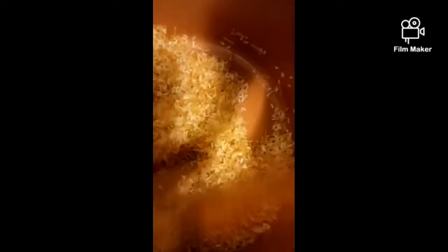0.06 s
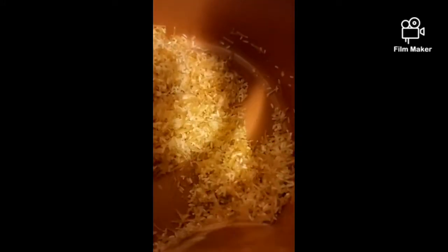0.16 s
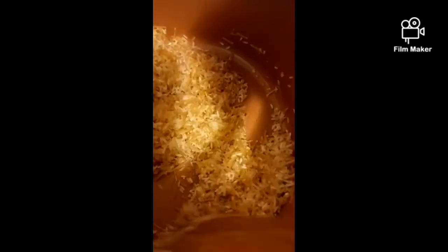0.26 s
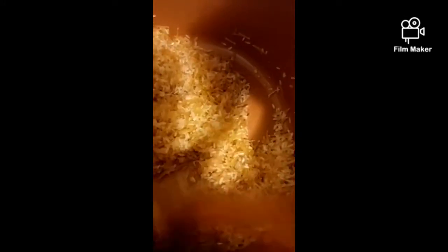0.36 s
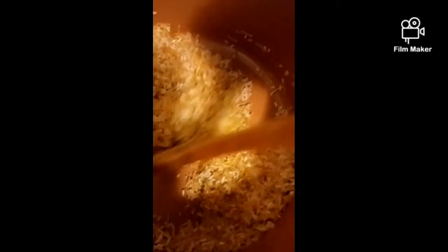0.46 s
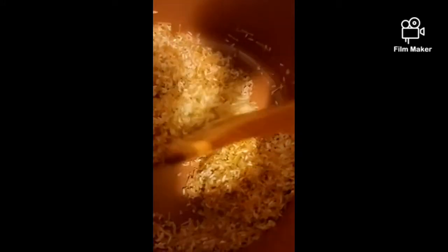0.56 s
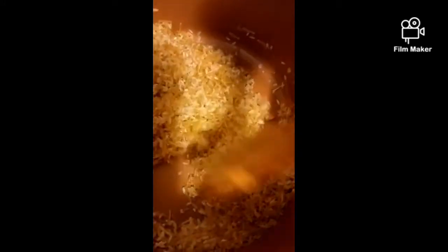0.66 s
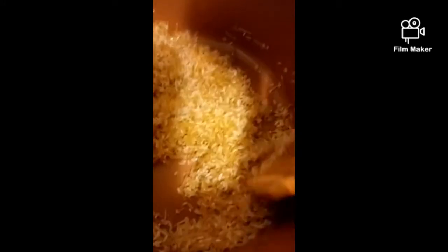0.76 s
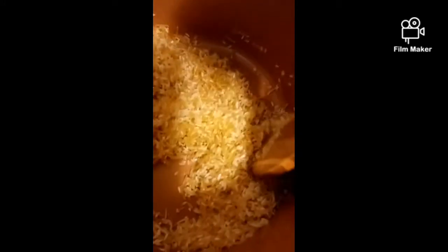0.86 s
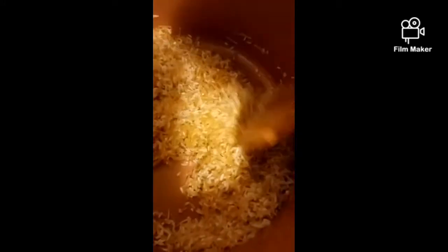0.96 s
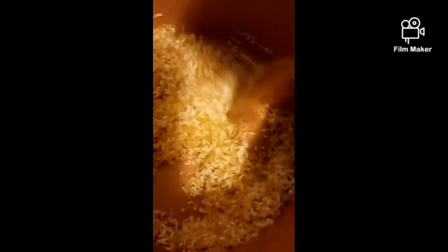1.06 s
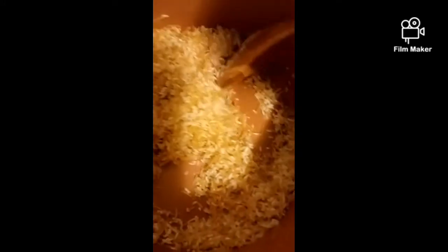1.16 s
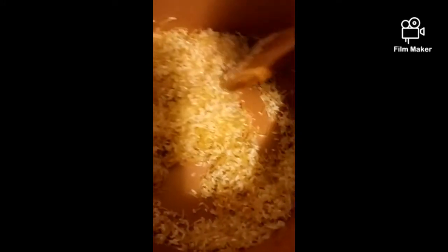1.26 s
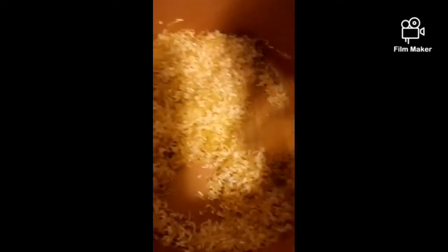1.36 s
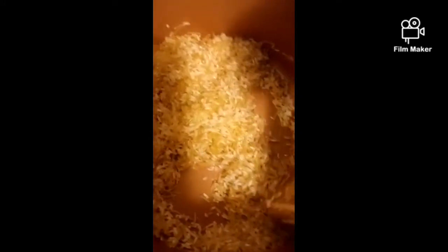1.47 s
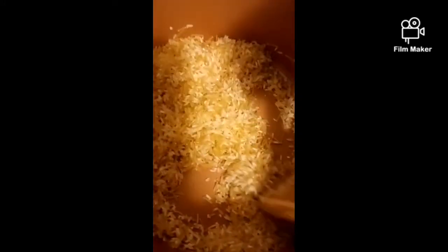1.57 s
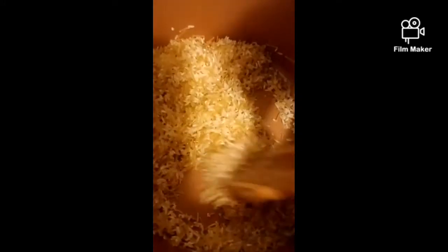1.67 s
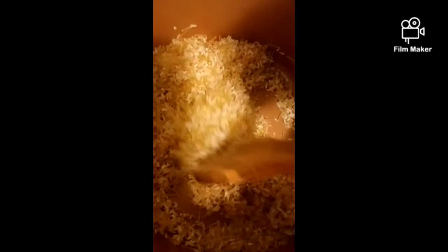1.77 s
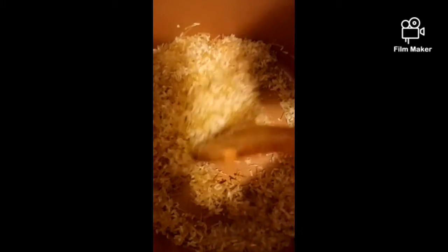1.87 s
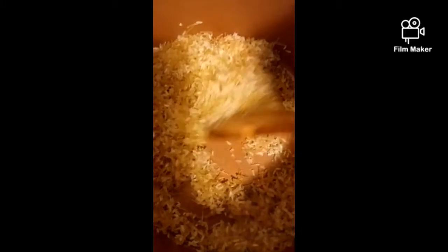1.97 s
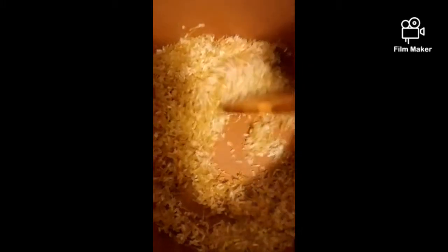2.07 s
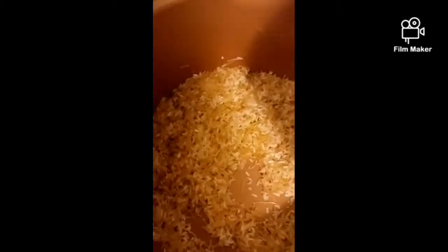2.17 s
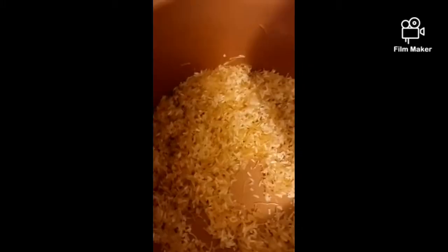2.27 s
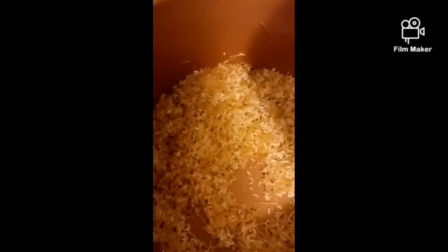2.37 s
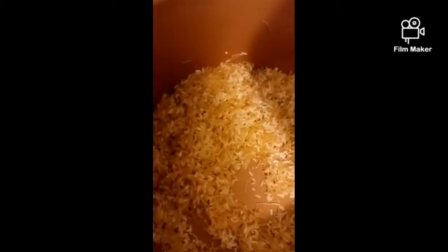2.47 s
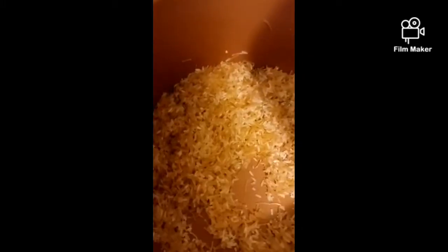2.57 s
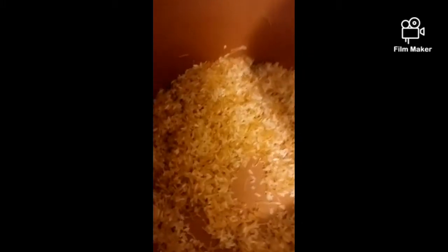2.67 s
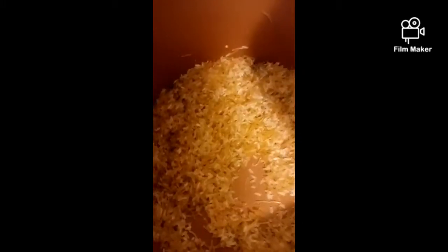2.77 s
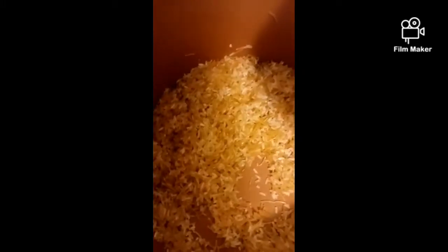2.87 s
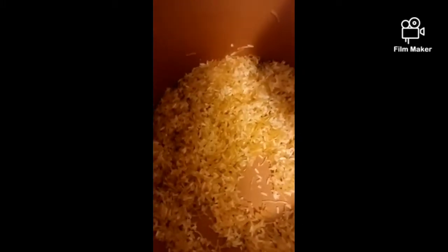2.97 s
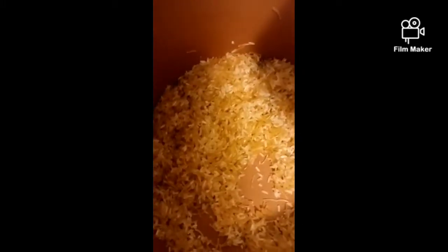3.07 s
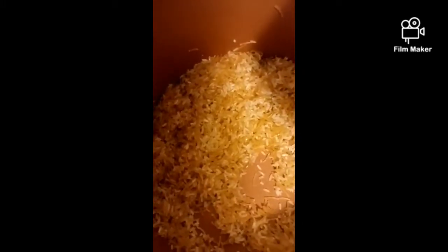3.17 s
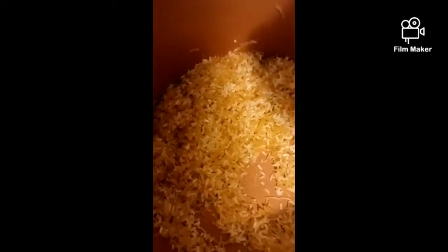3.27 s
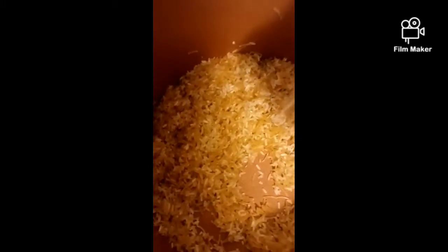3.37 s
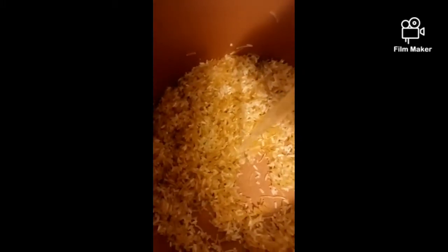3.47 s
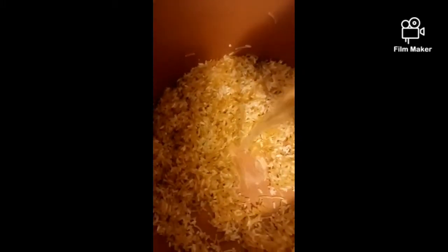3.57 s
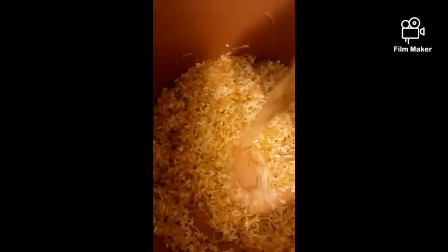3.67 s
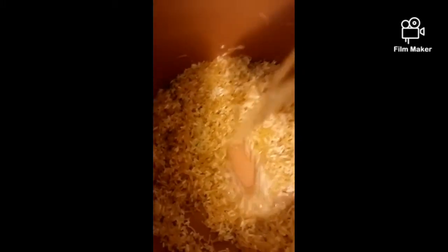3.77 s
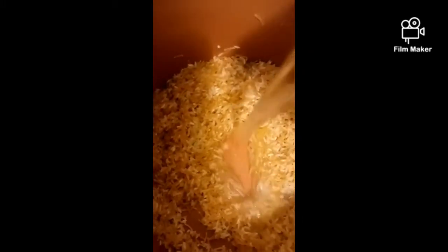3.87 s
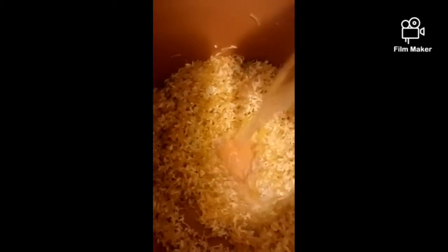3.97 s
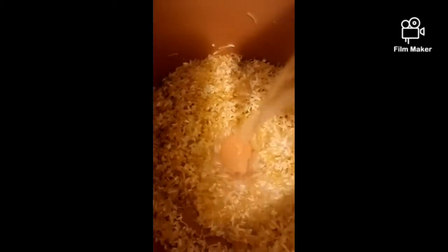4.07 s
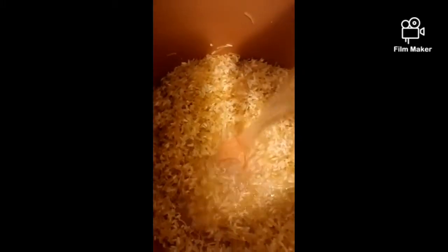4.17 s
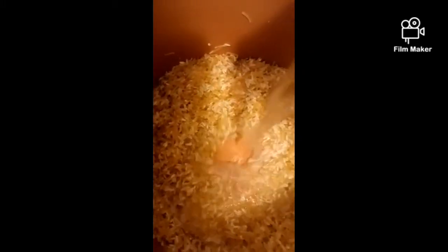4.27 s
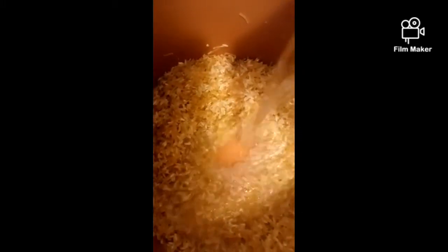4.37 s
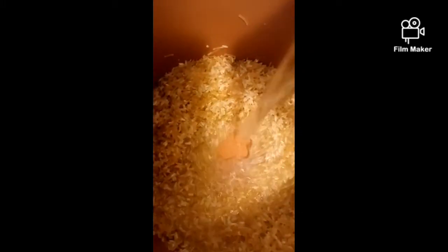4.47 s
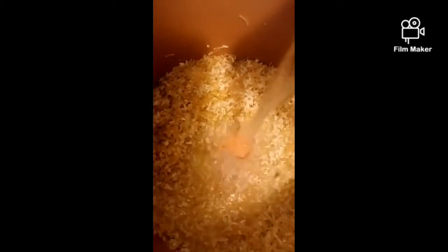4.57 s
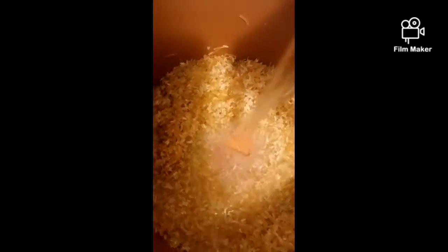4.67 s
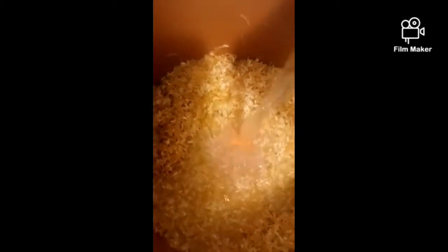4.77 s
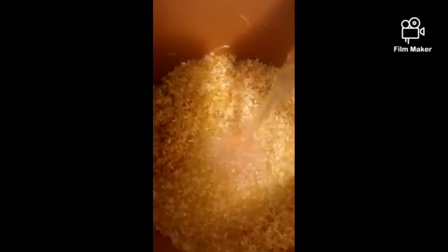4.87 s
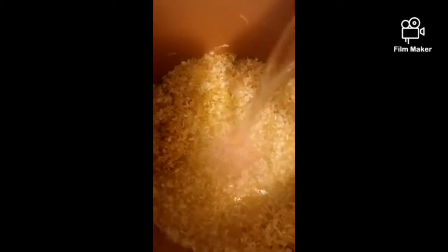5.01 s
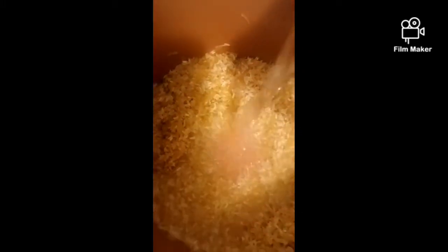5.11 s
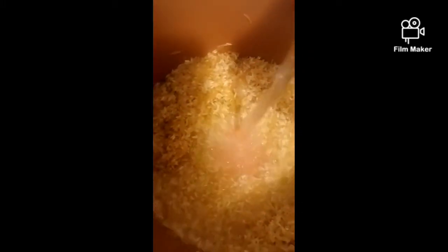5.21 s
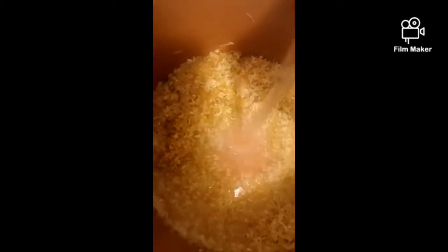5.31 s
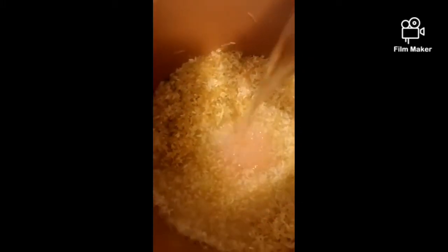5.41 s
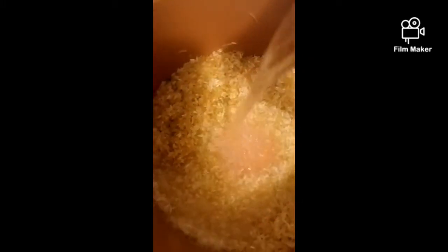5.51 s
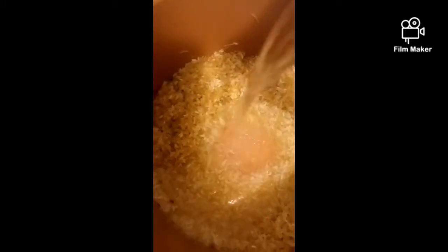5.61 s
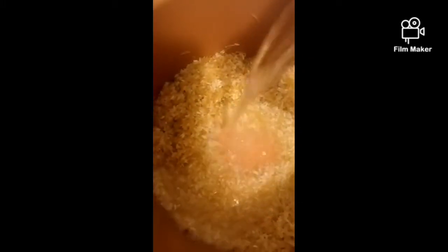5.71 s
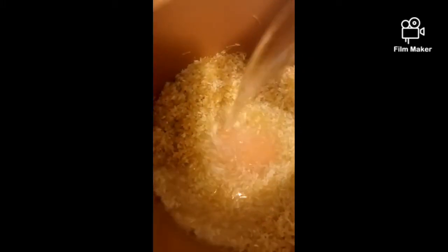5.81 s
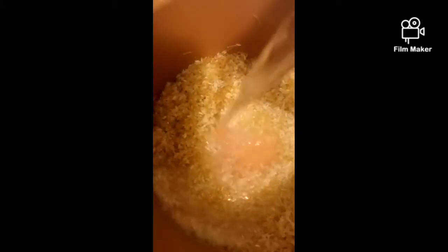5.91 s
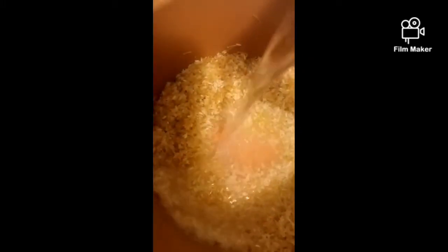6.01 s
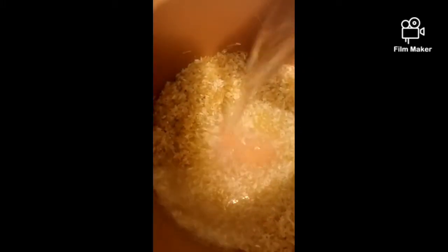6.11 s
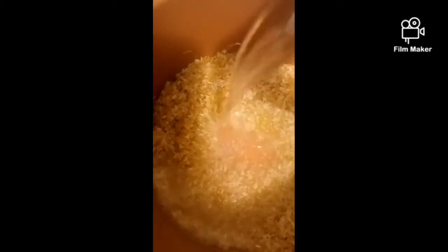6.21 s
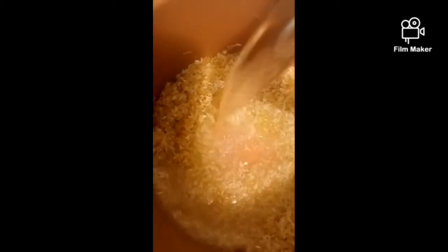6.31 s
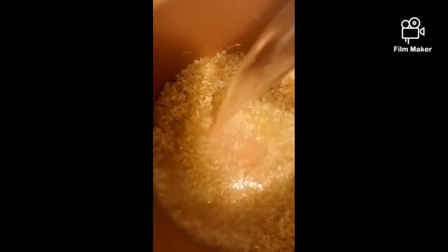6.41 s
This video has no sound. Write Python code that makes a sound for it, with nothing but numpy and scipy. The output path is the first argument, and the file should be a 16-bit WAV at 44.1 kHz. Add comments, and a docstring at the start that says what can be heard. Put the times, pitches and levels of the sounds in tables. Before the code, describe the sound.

Dry grains click and rustle as a spoon turns them, knocking and scraping a ringing pot for under three seconds. Dull bumps of a handled microphone intrude, strongest as stirring ends. After a lull with faint rumble, hiss and a stray click, a water jet bursts on, sizzling over the grains and growing fuller and bubblier, its bright spray easing. Close microphone in a small room.

```python
"""Stirring dry rice, then a running tap

Close up, a wooden spoon stirs dry rice in a pot: random clicks, coloured by spectrum, tick and rustle.
Scrapes and knocks ring the pot's resonances; fingers on the microphone add dull, sinking thuds.
Then a tap opens: dense droplets hiss on the grains, and rising damped tones bubble in the water.
A small kitchen answers the knocks and ticks; low rumble and steady hiss lie beneath.
"""
import sys
import numpy as np
from scipy import signal
from scipy.fft import rfft, irfft, next_fast_len
from scipy.io import wavfile
from scipy.ndimage import map_coordinates

SR = 44100
rng = np.random.default_rng(int(sys.argv[2]) if len(sys.argv) > 2 else 0)


def materialize(psi):
    """Save the field psi as 16-bit PCM at rate SR to the path in sys.argv[1].

    A 1-D psi becomes a single channel; in a 2-D psi each row is a channel.
    """
    bounded = np.clip(np.atleast_2d(psi).T, -1, 1)
    quanta = np.round(bounded * 32767).astype(np.int16)
    wavfile.write(sys.argv[1], SR, quanta)


N = 284445  # samples in the scene

# colour of the rice grains, relative: pitch_hz [Hz], level_db [dB per Hz]
GRAIN_SPECTRUM = [(300, -47), (1500, -30), (3200, -20.5), (4200, -12.5), (5100, -5), (5700, -13.5),
                  (6400, -15), (7700, -27.5), (9500, -12), (11200, -1), (12600, 0.5), (14000, -3.5),
                  (16000, -11.5)]
# how hard the rice is stirred: time_s [s], level_db [dB]
STIRRING_LEVEL = [(0, -41), (.35, -41), (.5, -41), (.64, -45), (1.0, -40), (1.62, -46.5), (1.85, -41),
                  (2.0, -43), (2.68, -44)]
# the strongest dull handling bumps: start_s [s], peak_db [dB]
HANDLING_BUMPS = [(0.1461, -22), (0.1696, -20.5), (0.1911, -18), (0.221, -26), (0.6213, -21.5),
                  (0.6465, -26), (0.6724, -19), (0.8901, -30), (0.9063, -26), (1.21, -24), (1.2618, -28.5),
                  (1.3672, -29.5), (1.528, -29), (1.5886, -30), (1.633, -31), (1.7573, -30.5),
                  (2.1186, -32), (2.152, -28), (2.2125, -25.5), (2.268, -19.5), (2.286, -26),
                  (2.464, -17.5), (2.492, -17), (2.5304, -22), (2.5583, -17), (2.619, -11.5),
                  (2.7163, -24.5), (2.877, -33.5), (3.89, -31.5), (3.913, -29.5), (4.5077, -26),
                  (5.273, -32.5)]
STIR_ENDS_S, SETTLE_S = 2.64, 0.16  # the heap comes to rest


def ticks():
    """Each hard grain gives a sharp click and a brief rattle among its neighbours; heavier hits sound lower."""
    # the loudest grains that strike the pot: start_s [s], level_db [relative dB],
    # weight_db [dB added to the colour below 7 kHz]
    loud_grains = [(0.0253, -24, -3), (0.1062, -24, -5), (0.153, -18, -2.5), (0.2007, -28, 2),
                   (0.2467, -18.5, -1), (0.289, -22, 5), (0.296, -19, 0), (0.3328, -26, 0),
                   (0.3668, -19.5, -2), (0.405, -20, -1), (0.411, -19, -3), (0.6344, -26, 7),
                   (0.6647, -20.5, 2.5), (0.6957, -19, 3), (0.7156, -16.5, -3), (0.7296, -25, 0),
                   (0.741, -23, 4), (0.8572, -21, 1), (0.862, -20, 2), (0.899, -19.5, 1), (0.944, -26, 3),
                   (0.9591, -22, -3), (1.018, -22.5, -1), (1.0548, -22, -2), (1.159, -18, 0),
                   (1.18, -22, 0), (1.3113, -25, 9), (1.7458, -22, 3), (2.0753, -26, -3),
                   (2.1037, -24, -10), (2.196, -21, -9), (2.297, -16, -2.5), (2.459, -20.5, -3),
                   (2.5307, -25, -8), (2.559, -25, -7), (2.5974, -18, -1), (3.338, -18, -1)]
    rattle_gain, rattle_t60_s = 0.17, 0.0094
    loudness_samples = 66  # the opening of the click that sets its level
    out = np.zeros(N)
    t = np.arange(SR // 50) / SR
    hz, grain_db = np.transpose(GRAIN_SPECTRUM)
    for start_s, level_db, weight_db in list(loud_grains) + stray_grains():
        rattle = rng.standard_normal(len(t)) * amp(-60 * t / rattle_t60_s)
        force = (t == 0) + rattle_gain * rattle
        click = coloured(force, np.c_[hz, grain_db + weight_db * (hz < 7000)])
        add(out, start_s, amp(level_db - 4.5) * click / click[:loudness_samples].std())
    return out


def stray_grains():
    """Fainter grains fly at random, louder with harder stirring; same columns as the loud grains."""
    rate_per_s, over_stirring_db = 25, 14.5
    level_scatter_db, weight_scatter_db = 2.0, 0.5
    start_s = moments(rate_per_s, STIR_ENDS_S)
    level, weight = rng.standard_normal(size=(2, len(start_s)))
    stirring_db = np.interp(start_s, *np.transpose(STIRRING_LEVEL))
    level_db = stirring_db + over_stirring_db + level_scatter_db * level
    return list(zip(start_s, level_db, weight_scatter_db * weight))


def rustle():
    """The heap slides in little avalanches: small clicks over a fine rubbing of husks."""
    gain_db, fine_db = -1.0, -3  # fine_db: rubbing relative to the clicks
    clump_db, surge_db = 2, 1.4  # depth of the quick and of the slow swelling
    grains = patter(rate=1200, spread_db=8) + amp(fine_db) * rng.standard_normal(N)
    clumped = grains * amp(clump_db * wobble(60))
    surge = amp(gain_db + surge_db * wobble(10.36))
    return stirring() * surge * unit(coloured(clumped, GRAIN_SPECTRUM))


def stirring():
    """Gain of the moving heap: it follows the stirring and dies as the rice settles."""
    level_db, = curves(STIRRING_LEVEL)
    return amp(level_db) * (1 - ramp(STIR_ENDS_S, SETTLE_S))


def scrape():
    """The spoon drags grains along the wall, which resounds with their slips; trapped grains crunch."""
    # strokes of the spoon: start_s [s], length_s [s], scrape_db [relative dB], crunch_db [dB]
    strokes = [(0.445, 0.032, -29.5, -55), (0.902, 0.069, -41.5, -61), (1.029, 0.13, -33, -37),
               (1.714, 0.081, -39, -44.5), (1.836, 0.023, -35, -50), (1.95, 0.16, -44, -65),
               (2.29, 0.047, -44.5, -55)]
    # colour of the rubbed wall, relative: pitch_hz [Hz], level_db [dB per Hz]
    wall_spectrum = [(150, -21), (300, -4.5), (500, 1), (640, -4.5), (800, -12.5), (1150, -17),
                     (1450, -15.5), (2200, -16), (2850, -15.5), (3500, -14.5), (4500, -31), (5150, -9),
                     (5700, -44), (6400, -17.5), (7700, -35), (16000, -10)]
    # colour of crushed grains, relative: pitch_hz [Hz], level_db [dB per Hz]
    husk_spectrum = [(1000, -23), (2300, -23), (2800, -2), (3500, -16.5), (4500, -9), (5200, 3), (5800, -8),
                     (6500, -9), (7700, -27), (11500, -1.5), (16000, -20)]
    gain_db, judder_db = -1, 1.0
    drag_db = -10.5  # between strokes the heap rubs on the wall, relative to the stirring
    rubbing = amp(drag_db) * stirring()
    crushing = np.zeros(N)
    for start_s, length_s, scrape_db, crunch_db in strokes:
        pressure = stroke(start_s, length_s)
        rubbing = np.maximum(rubbing, amp(scrape_db) * pressure)
        crushing += amp(crunch_db) * pressure
    slips = patter(rate=3200, spread_db=3) * amp(judder_db * wobble(110))
    ringing_wall = unit(pot(coloured(slips, wall_spectrum)))
    crunch = unit(coloured(patter(rate=3900, spread_db=0), husk_spectrum))
    return amp(gain_db) * rubbing * ringing_wall + crushing * crunch


def stroke(start_s, length_s):
    """Gain of one stroke: a quick bite, growing pressure, release."""
    attack_s, swell_db, release_t60_s = 0.0036, 7, 0.28
    after_s = np.maximum(np.arange(N) / SR - start_s - length_s, 0)
    pressure_db = swell_db * (ramp(start_s, length_s) - 1)
    return ramp(start_s, attack_s) * amp(pressure_db - 60 * after_s / release_t60_s)


def knocks():
    """Knocks, at first from the spoon, chatter and ring the pot; slips of the spoon give short tones."""
    # knocks on the pot: start_s [s], level_db [relative dB],
    # centre_hz [Hz, of the contact], width [octaves], chatter_t60_s [s]
    pot_knocks = [(0.217, -26, 1930, 0.95, 0.028), (0.441, -29.5, 3570, 0.44, 0.083),
                  (0.456, -28.5, 3800, 0.82, 0.064), (.482, -34.5, 2800, 1.1, 0.033),
                  (0.8579, -31.5, 1160, 1.17, 0.11), (1.135, -29, 3800, 0.98, .07),
                  (1.574, -21, 1470, 1.2, 0.086), (1.849, -34, 1400, 1.12, 0.075),
                  (1.875, -42, 900, 1.2, 0.068), (2.727, -45, 1500, 1.9, 0.018),
                  (2.778, -38.5, 280, 0.66, 0.033), (3.127, -39.5, 332, 2.2, 0.27),
                  (3.3374, -33.5, 3760, 1.1, 0.027)]
    # the spoon catches on the bottom and slips: start_s [s], peak_db [dB], pitch_hz [Hz]
    spoon_slips = [(.468, -30, 507), (.492, -27.5, 500), (.5, -27, 490), (.524, -36, 490),
                   (1.735, -22.5, 456), (1.753, -16, 505), (1.874, -29, 554), (2.117, -39.5, 490),
                   (2.352, -42, 493)]
    # colour of the blow, as of wood, relative: pitch_hz [Hz], level_db [dB per Hz]
    wood_spectrum = [(120, 19), (230, 21), (500, 11), (800, -5), (1150, -2.5), (1500, -6), (2200, -5),
                     (2800, -8.5), (5000, -0.5), (6500, -4.5), (7700, -14.5), (12000, 11)]
    strike_gain = 5  # first impulse against the chatter
    loudness_samples = 400  # the opening of the blow that sets its level
    out = np.zeros(N)
    t = np.arange(SR // 3) / SR
    grid_hz = np.geomspace(50, SR / 2, num=60)
    for start_s, level_db, centre_hz, octaves, t60_s in pot_knocks:
        chatter = rng.standard_normal(len(t)) * amp(-60 * t / t60_s)
        force = strike_gain * (t == 0) + chatter
        # the contact picks the range struck: the colour falls away on both sides of its centre
        off_centre_db = np.minimum(3 * (np.log2(grid_hz / centre_hz) / octaves) ** 2, 50)
        contact = np.c_[grid_hz, along(wood_spectrum, grid_hz) - off_centre_db]
        blow = pot(coloured(force, contact))
        add(out, start_s, amp(level_db - 3) * blow / blow[:loudness_samples].std())
    for start_s, peak_db, pitch_hz in spoon_slips:
        add(out, start_s, amp(peak_db) * throb(pitch_hz, rise_s=0.0025))
    return out


def pot(x):
    """The direct sound plus the ringing of the pot's modes."""
    # the pot's resonances: pitch_hz [Hz], level_db [dB over the direct sound], t60_s [s]
    modes = [(246, 6, 0.12), (423, -1, 0.032), (505, 0.5, 0.099), (1086, 4, 0.08), (1180, 5.5, 0.041),
             (1757, 3, 0.022), (2100, 1.5, 0.014), (2320, -3, 0.037), (2660, 5, 0.025), (2880, -6, .05),
             (3440, 0, 0.035), (4030, 5, 0.026), (4960, 1.5, 0.014), (5270, -10, 0.022)]
    t = np.arange(SR // 5) / SR
    response = (t == 0) * 1.0
    for pitch_hz, level_db, t60_s in modes:
        fade = amp(-60 * t / t60_s)
        response += amp(level_db) * 2 * fade / fade.sum() * np.cos(2 * np.pi * pitch_hz * t)
    return signal.fftconvolve(x, response)[:len(x)]


def bumps():
    """Fingers shift on the microphone's housing: soft thuds whose deepest part arrives last."""
    final_hz, detune_scatter = 88, 0.061
    out = np.zeros(N)
    thuds = list(HANDLING_BUMPS) + fidgets()
    detunes = rng.normal(1, detune_scatter, len(thuds))
    for (start_s, peak_db), detune in zip(thuds, detunes):
        add(out, start_s, amp(peak_db) * throb(final_hz * detune, rise_s=0.0062, bend=1.33))
    return out


def fidgets():
    """Fingers stick and slip: a fainter thud leads each bump and another trails it; same columns as the bumps."""
    shortest_gap_s = 0.018  # the longest is twice that
    relative_db, scatter_db = -12.5, 5  # the scatter only weakens them
    gap, drop = rng.random((2, len(HANDLING_BUMPS), 2))
    bump_s, bump_db = np.transpose(HANDLING_BUMPS)
    start_s = bump_s[:, None] + np.array([-1, 1]) * shortest_gap_s * (1 + gap)
    peak_db = bump_db[:, None] + relative_db - scatter_db * drop
    return list(zip(start_s.ravel(), peak_db.ravel()))


def tap():
    """The aerated jet bursts into droplets on the rice and beats bubbles into the water."""
    # the jet's spray: time_s [s], level_db [dB]
    jet_level = [(3.57, -20.5), (3.66, -17.5), (3.82, -21), (5.9, -26), (6.42, -26.5)]
    # colours of droplets on rice, jet on bare bottom, jet on water and bubbling pool,
    # each relative: pitch_hz [Hz], level_db [dB per Hz]
    spray_spectrum = [(4000, -24.5), (7700, -23), (8600, -16.5), (10000, -7), (11300, 1), (12500, 0.5),
                      (14000, -2.5), (16000, -12)]
    bottom_spectrum = [(1200, -41), (1600, -21), (1780, -1), (2080, -2), (2300, -15), (2680, -11),
                       (2900, 1), (3200, -11), (3500, -1.5), (4300, 0), (5020, 7), (5800, 2), (6400, 3),
                       (7700, -36), (10000, -39)]
    splash_spectrum = [(900, -37), (1550, -19), (2150, -16.5), (2600, -10.5), (3000, -9), (3800, -6.5),
                       (4500, -4.5), (5020, 0.5), (5750, -9.5), (6350, -7.5), (7000, -16), (7700, -33),
                       (10000, -29)]
    pool_spectrum = [(40, -56), (100, -14), (160, -13), (250, -4), (380, -6.5), (510, 3), (740, -6.5),
                     (1000, -5.5), (1170, -1), (1450, -8), (2200, 2), (4000, -55)]
    opens_s, opening_s = 3.537, 0.02
    gather_s, dry_pool_db = 0.63, -10  # bubbling starts this much weaker and grows to full strength
    shallow_splash_db, shallow_pool_db = -28, -39.5
    depth_splash_db, depth_pool_db = 2.5, 1.8  # more water splashes and bubbles more
    deep_cushion_db = -4  # deep water softens splash and bubbling
    flutter_db, bubble_db, pitch_rise = 0.6, -9, 1.095

    # the water covers the bottom, rises, and at last cushions the jet
    covered = ramp(3.74, 0.38)
    depth = ramp(4.54, 2.5)
    cushion_db = deep_cushion_db * ramp(5.24, 0.87)
    spray_db, = curves(jet_level)
    splash_db = shallow_splash_db + depth_splash_db * depth + cushion_db
    gathering_db = dry_pool_db * (1 - ramp(opens_s, gather_s))
    pool_db = shallow_pool_db + gathering_db + depth_pool_db * depth + cushion_db
    valve = ramp(opens_s, opening_s) ** 2

    drops = patter(rate=16000, spread_db=2.5) * amp(flutter_db * wobble(300))
    small_bubbles = bubbles(1626, 7280, cycles=62, count=6000)
    fizz = amp(bubble_db) * small_bubbles + patter(rate=14000, spread_db=2.5)
    large_bubbles = bubbles(259, 1640, cycles=9.0, count=2500, size=1500)
    gurgle = amp(bubble_db) * large_bubbles + patter(rate=9000, spread_db=4.0)

    spray = amp(spray_db) * unit(coloured(drops, spray_spectrum))
    # the jet drums on the bottom until water covers it
    drumming = np.sqrt(1 - covered) * unit(coloured(drops, bottom_spectrum))
    splash = np.sqrt(covered) * unit(coloured(fizz, splash_spectrum))
    # the air above the water shrinks: crossfade to a higher resonance
    risen_spectrum = np.multiply(pool_spectrum, [pitch_rise, 1])
    hollow = (1 - depth) * coloured(gurgle, pool_spectrum) + depth * coloured(gurgle, risen_spectrum)
    return valve * (spray + amp(splash_db) * (drumming + splash) + amp(pool_db) * unit(hollow))


def kitchen(x):
    """The room's short tail; the treble dies first."""
    # the room's decay: pitch_hz [Hz], t60_s [s]
    decay = [(100, 0.66), (500, 0.55), (3000, 0.12), (12000, 0.06)]
    frame = 256  # samples, also the delay before the tail
    hz, t, bins = signal.stft(rng.standard_normal(SR // 2), SR, nperseg=frame)
    fade = amp(-60 * t / along(decay, hz)[:, None])
    tail = signal.istft(bins * fade, SR, nperseg=frame)[1]
    return signal.fftconvolve(np.pad(x, (frame, 0)), tail / np.linalg.norm(tail))[:N]


def background():
    """Low room rumble, which sinks at 3.8 s, and a steady hiss, both coloured noise."""
    # colours of rumble and hiss, each relative: pitch_hz [Hz], level_db [dB per Hz]
    rumble_spectrum = [(30, -27), (60, -3), (110, 2.5), (170, -10.5), (250, -4), (400, -18), (560, -30),
                       (900, -32), (2000, -52)]
    hiss_spectrum = [(500, -36), (900, -27), (2000, -17.5), (3000, -12.5), (4200, -8), (5050, -3),
                     (5700, -11), (6400, -9), (7700, -26), (9500, -10.5), (11500, 2), (13000, -2.5),
                     (16000, -5.5)]
    start_db, sink_db, hiss_db = -50, -14.5, -49.5
    rumble_db = start_db + sink_db * ramp(3.78, 0.34)
    rumble = unit(coloured(rng.standard_normal(N), rumble_spectrum)) * amp(0.47 * wobble(7.45))
    hiss = unit(coloured(rng.standard_normal(N), hiss_spectrum))
    return amp(rumble_db) * rumble + amp(hiss_db) * hiss


def amp(db):
    """Decibels to gain."""
    return 10 ** (np.asarray(db) / 20)


def unit(x):
    """Scale to rms 1."""
    return x / np.sqrt(np.mean(x ** 2) + 1e-20)


def along(points, hz):
    """Read a curve of (Hz, value) points on a log axis."""
    point_hz, value = np.transpose(points)
    return np.interp(np.log(hz + 1), np.log(point_hz), value)


def curves(rows):
    """One value per sample for each column after the time."""
    time_s, *columns = np.transpose(rows)
    return [np.interp(np.arange(N) / SR, time_s, column) for column in columns]


def ramp(start_s, duration_s):
    """Rises evenly from 0 to 1 over the duration."""
    return np.clip((np.arange(N) / SR - start_s) / duration_s, 0, 1)


def wobble(rate):
    """A smooth random curve, rate knots a second."""
    knots = rng.standard_normal(int(N * rate / SR) + 4)
    return map_coordinates(knots, [np.arange(N) * rate / SR])


def moments(rate, until_s):
    """Random times before until_s, one in each slot of 1 / rate seconds."""
    time_s = (np.arange(200) + rng.random(200)) / rate
    return time_s[time_s < until_s]


def add(track, start_s, sound):
    """Lay a sound into a track."""
    part = track[max(round(start_s * SR), 0):][:len(sound)]
    part += sound[:len(part)]


def coloured(x, spectrum, size=4096):
    """Causal minimum-phase filter with the given spectrum, made by folding its cepstrum."""
    gain = amp(along(spectrum, np.fft.rfftfreq(size, 1 / SR)))
    cepstrum = irfft(np.log(gain))
    cepstrum[1:size // 2] *= 2
    cepstrum[size // 2 + 1:] = 0
    return signal.fftconvolve(x, irfft(np.exp(rfft(cepstrum))))[:len(x)]


def patter(rate, spread_db):
    """Random tiny impacts of uneven size, rate a second, rms 1."""
    size = amp(spread_db * np.clip(rng.standard_normal(N), -2, 2))
    hits = rng.random(N) < rate / SR
    return unit(hits * size * rng.choice([-1, 1], N))


def bubbles(low_hz, high_hz, cycles, count, size=700):
    """Short damped tones whose pitch rises as each bubble nears the surface, rms 1."""
    when, pitch = rng.random((2, count, 1))
    hz = low_hz * (high_hz / low_hz) ** pitch
    age = np.arange(size) / SR * hz / cycles  # 1 when the tone has faded by 60 dB
    tones = amp(-60 * age) * np.sin(2 * np.pi * cycles * age * (1 + age / 10))
    places = (when * N).astype(int) + np.arange(size)
    return unit(np.bincount(places.ravel(), tones.ravel())[:N])


def throb(hz, rise_s, bend=0):
    """A tone that swells to 1 in rise_s and dies; with bend it starts higher and sinks to hz."""
    t = np.arange(SR // 10) / SR
    turns = hz * (t + bend * rise_s * (1 - np.exp(-t / rise_s)))
    swell = (t / rise_s * np.exp(1 - t / rise_s)) ** 2
    return swell * np.sin(2 * np.pi * turns)


def scene():
    """Everything happens close by, heard alike in both channels."""
    room_db = -13
    blows = knocks() + ticks()
    room = amp(room_db) * kitchen(blows)
    mono = blows + room + bumps() + rustle() + scrape() + tap() + background()
    return np.array([mono, mono])


def record(dry):
    """A high-pass thins the deep bass; a steep cut leaves nothing above the band limit."""
    low_cut_hz, top_hz = 52, 15950
    high_pass = signal.butter(3, low_cut_hz, "high", fs=SR, output="sos")
    dry = signal.sosfilt(high_pass, dry)
    size = next_fast_len(N + SR // 2)
    in_band = np.fft.rfftfreq(size, 1 / SR) < top_hz
    return irfft(rfft(dry, size) * in_band, size)[:, :N]


dry = scene()
out = record(dry)
materialize(out)
```